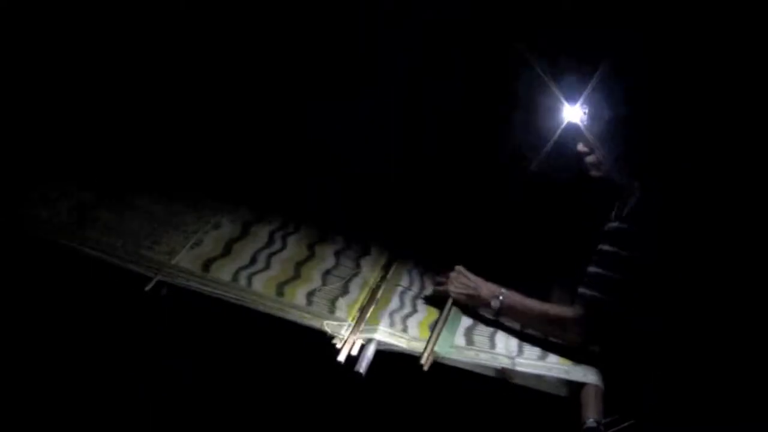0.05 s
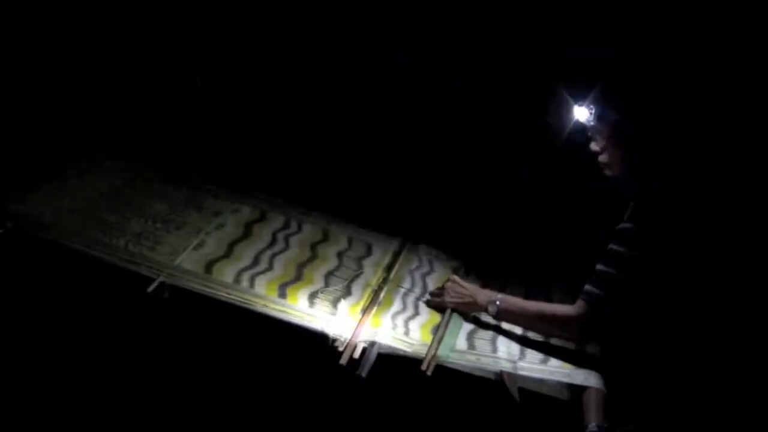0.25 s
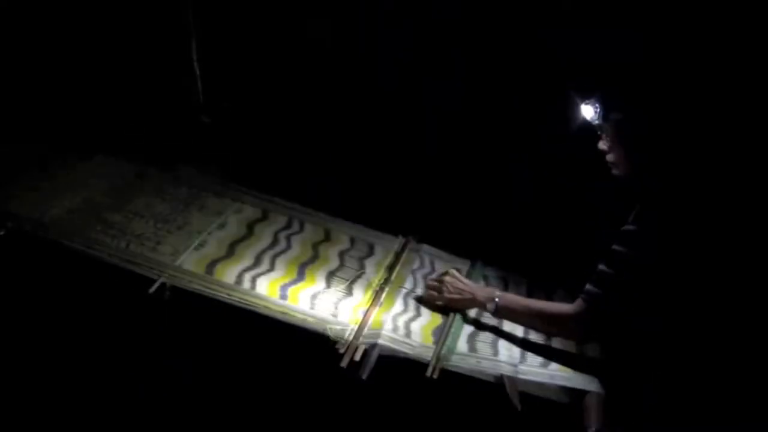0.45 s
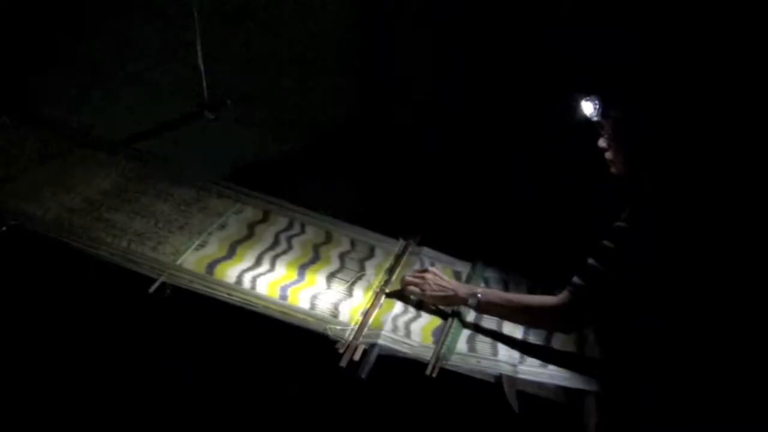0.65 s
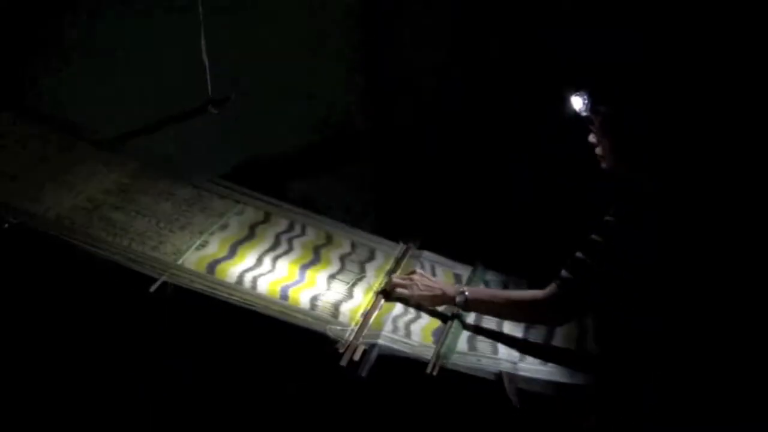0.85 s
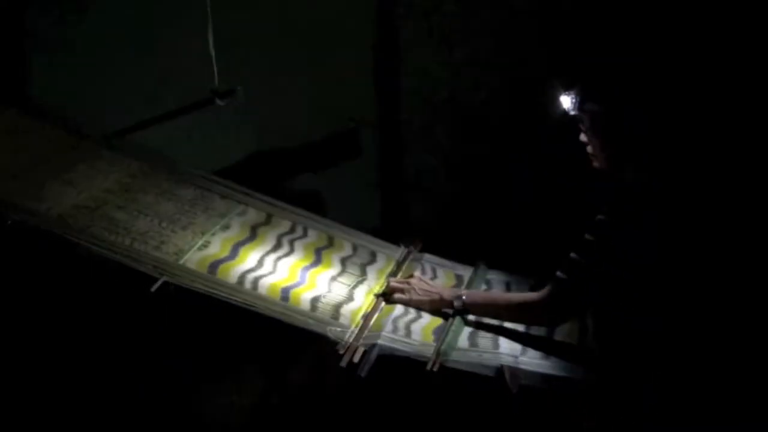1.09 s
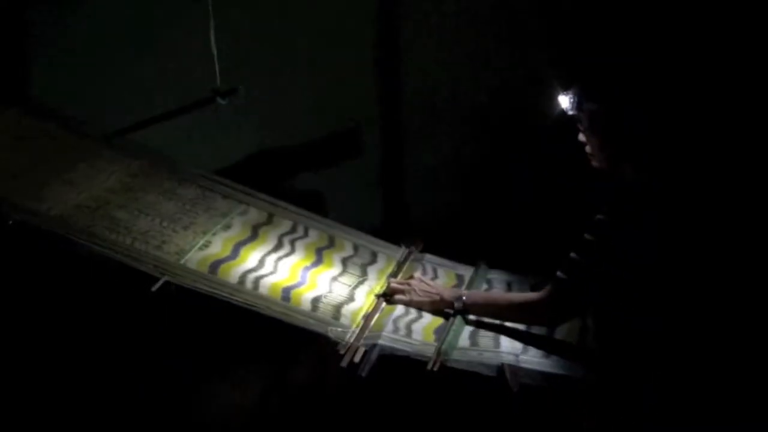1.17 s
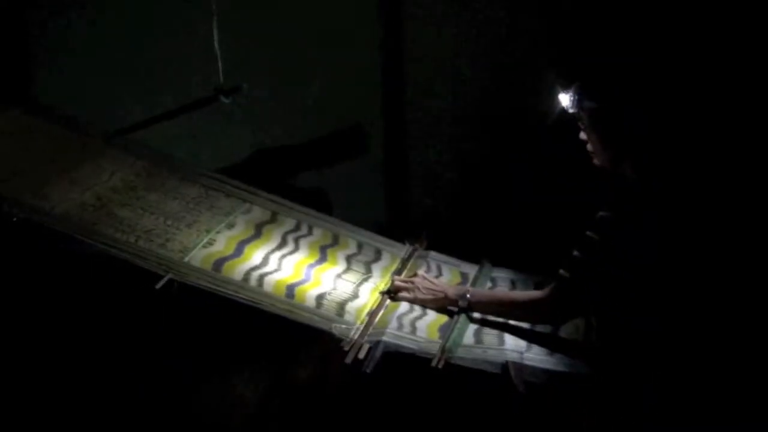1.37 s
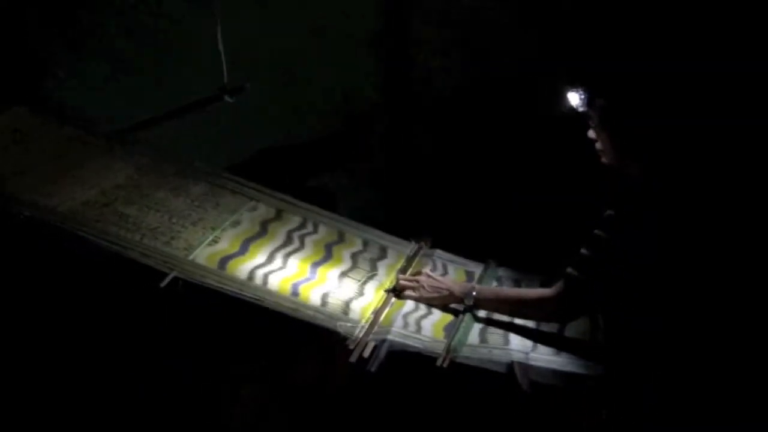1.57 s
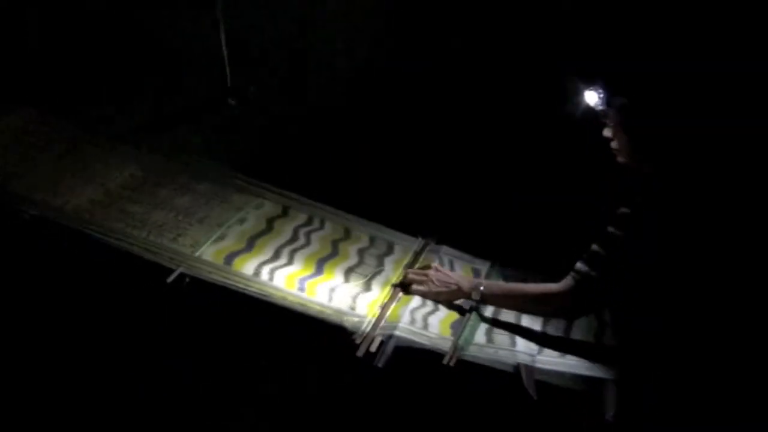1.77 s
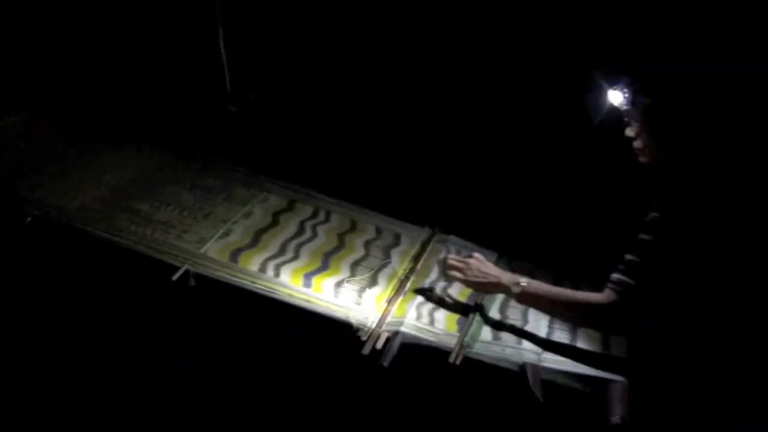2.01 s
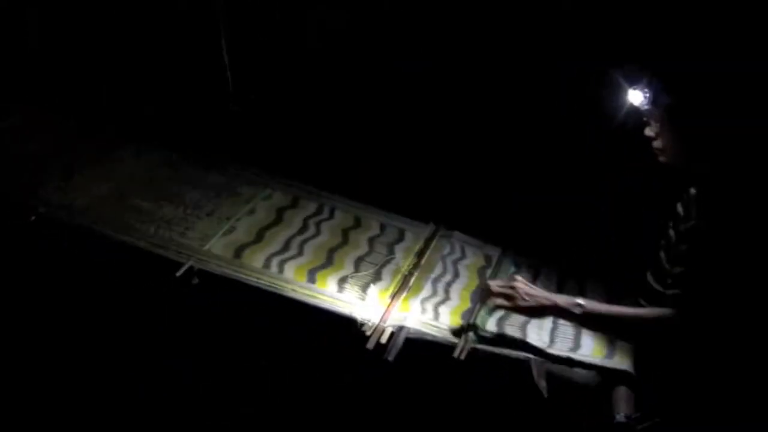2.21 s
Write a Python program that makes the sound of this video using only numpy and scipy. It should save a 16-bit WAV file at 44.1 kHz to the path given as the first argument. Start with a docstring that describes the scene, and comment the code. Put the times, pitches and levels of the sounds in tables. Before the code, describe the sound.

In a small, hard-walled room, a stick clacks brightly against loom rods and taps again, then a wooden bar knocks into place. Fingers barely brush the threads near the end, over faint hiss and a thin whine.

```python
"""A small, hard-walled room at night, with a hand loom. A hard stick clacks against the rods and taps
again; a wooden bar is nudged and knocks home. Each impact radiates a pulse, which the near walls
reflect, and excites damped modes. Fingers then brush the warp threads. Behind it all lie faint
electrical pips, hiss, and a thin whine like far insects."""
import sys
import numpy as np
from scipy import signal
from scipy.fft import rfft, irfft, next_fast_len
from scipy.io import wavfile
from scipy.ndimage import map_coordinates

SR = 44100
rng = np.random.default_rng(int(sys.argv[2]) if len(sys.argv) > 2 else 0)


def digitize_waveform(pressure):
    """Quantize a signal to 16-bit integers and store it at the path in sys.argv[1].

    Rows of a 2-D input are taken as channels; values are limited to [-1, 1].
    """
    field = np.atleast_2d(pressure).T
    bounded = np.clip(field, -1, 1)
    quanta = np.round(bounded * 32767).astype(np.int16)
    wavfile.write(sys.argv[1], SR, quanta)


N = 99225


# Blows of the stick. Each row: start in seconds, crack, stick ring and rod ring levels in dB,
# contact cut-off in Hz, room gain in dB.
STICK_BLOWS = [(0.2415, -0.5, -29.5, -41.5, 17000, 3.5), (0.4779, -23, -52.5, -51, 4500, -1),
               (0.528, -35, -65, -57, 2130, 2.5)]
# Spectrum of the crack. Each row: frequency in Hz, relative level in dB.
CRACK_SPECTRUM = [(60, -61), (160, -44), (350, -42), (700, -25), (1400, -24), (2100, -11.5), (3200, -7),
                  (4150, 4), (4900, 2), (6200, -6.5), (7600, -12.5), (8900, -7.5), (9500, -7.5),
                  (10400, -15.5), (12300, -24), (15500, -30)]
# Modes of stick and rods. Each row: frequency in Hz, relative level in dB, 60 dB decay time in seconds.
STICK_MODES = [(3497, -10, .36), (3672, -5, .3), (3925, -7, .4), (4097, 0, .31), (4174, -4, .26),
               (4232, -2, .3), (4548, -7, .52), (4582, -6, .33), (4802, 2, .28), (5042, -4, .25),
               (5284, -1, .22), (5611, -4, .32), (5857, -13, .3), (6457, -13, .22), (8925, -11, .36),
               (9050, -13, .33)]
ROD_MODES = [(1879, 0, .22), (2107, -4, .2), (2601, -6, .25), (2751, -6, .25)]
def stick():
    """Impact excitation: a hard contact gives a bright crack and sets stick and rods vibrating freely."""
    out = np.zeros(N)
    for start, crack_db, stick_db, rod_db, cut_hz, room_db in STICK_BLOWS:
        crack = signal.fftconvolve(impact(CRACK_SPECTRUM, cut_hz), room(room_db, smear_s=0.000777))
        add(out, start, amp(crack_db) * crack)
        for modes, db in (STICK_MODES, stick_db), (ROD_MODES, rod_db):
            add(out, start, amp(db) * ring(modes, cut_hz, attack_s=0.00067, rough=0.73, flutter_hz=56.94))
    return out


# Blows of the bar. Each row: start in seconds, thud and ring levels in dB, contact cut-off in Hz,
# room gain in dB.
BAR_BLOWS = [(1.2709, -29, -63, 1391, 2.5), (1.277, -25.5, -74, 6500, 0.5),
             (1.3002, -15.5, -32.5, 6100, -5.5), (1.3093, -16, -69, 6360, -5)]
# Spectrum of the thud. Each row: frequency in Hz, relative level in dB.
THUD_SPECTRUM = [(60, -45), (140, -45), (290, -11), (480, -17), (720, -5.5), (930, -13), (1170, 0),
                 (1380, -10.5), (1630, 4.5), (1860, -10.5), (2090, 5), (2350, -5.5), (2620, -4),
                 (2950, -11), (4700, -17), (5200, -12), (6200, -28), (14000, -40)]
# Modes of the bar. Each row: frequency in Hz, relative level in dB, 60 dB decay time in seconds.
BAR_MODES = [(737, -16, .36), (1150, -14, .32), (1202, -17, .25), (1624, -3, .27), (1705, -11, .18),
             (2003, -9, .16), (2075, -6, .13), (2125, 1, .24), (2173, -9, .2), (2631, -9, .2),
             (5130, -16, .28)]
def bar():
    """Impact excitation: a softer contact gives a dull thud and the hollow resonance of wood."""
    out = np.zeros(N)
    for start, thud_db, ring_db, cut_hz, room_db in BAR_BLOWS:
        thud = signal.fftconvolve(impact(THUD_SPECTRUM, cut_hz), room(room_db, smear_s=0.00113))
        add(out, start, amp(thud_db) * thud)
        add(out, start, amp(ring_db) * ring(BAR_MODES, cut_hz, attack_s=0.0048, rough=0.3, flutter_hz=59))
    return out


def impact(spectrum, cut_hz, size=2048):
    """Minimum phase: folding the cepstrum turns a spectrum into a causal pulse, here of unit energy."""
    hz = np.fft.rfftfreq(size, 1 / SR)
    cepstrum = irfft(np.log(amp(along(spectrum, hz)) * softness(hz, cut_hz)))
    folded = np.r_[cepstrum[0], 2 * cepstrum[1:size // 2]]
    pulse = irfft(np.exp(rfft(folded, size)))
    return pulse / np.linalg.norm(pulse)


def ring(modes, cut_hz, attack_s, rough, flutter_hz):
    """Modal superposition: damped modes add, each fluttering in level and phase as if echoes overlapped."""
    t = np.arange(SR) / SR
    out = np.zeros(len(t))
    for hz, db, t60 in modes:
        knots = rng.standard_normal((2, 256))
        in_phase, quadrature = (rough * map_coordinates(k, [t * flutter_hz], mode="mirror") for k in knots)
        phase = 2 * np.pi * (hz * t + rng.random())
        level = amp(db - 60 * t / t60) * softness(hz, cut_hz)
        out += level * ((1 + in_phase) * np.sin(phase) + quadrature * np.cos(phase))
    return out * (1 - np.exp(-t / attack_s))


def softness(hz, cut_hz):
    """Contact compliance: a soft contact acts as a low-pass filter."""
    return 1 / np.sqrt(1 + (hz / cut_hz) ** 6)


# Reflections from near walls. Each row: delay in seconds, relative level in dB.
WALL_ECHOES = [(.0073, -2.5), (.0112, -1), (.0156, -6.5), (.0199, -3), (.0243, -10)]
# Decay of the room. Each row: frequency in Hz, reverberation time in seconds.
REVERB_TIMES = [(200, 0.46), (1000, .48), (2500, 0.35), (4500, 0.41), (9000, 0.35), (14000, 0.34)]
# Spectrum of the tail. Each row: frequency in Hz, relative level in dB.
TAIL_SPECTRUM = [(300, 1.5), (1300, 3.5), (2500, 4.5), (4500, -4.5), (7000, -1), (9000, 4.5), (13000, -2)]
def room(room_db, smear_s):
    """Reverberation: direct sound, floor and wall echoes, scatter off the loom and a diffuse tail."""
    rise_s, scatter_t60_s = 0.02, 0.082
    hz, t, bands = signal.stft(rng.standard_normal(SR), SR, nperseg=256)
    decay_db = 60 * t / along(REVERB_TIMES, hz)[:, None]
    tail = signal.istft(bands * amp(along(TAIL_SPECTRUM, hz)[:, None] - decay_db), SR, nperseg=256)[1]
    t = np.arange(len(tail)) / SR
    tail *= 1 - np.exp(-t / rise_s)
    scatter = rng.standard_normal(len(t)) * amp(-60 * t / scatter_t60_s)
    response = amp(4) * tail / np.linalg.norm(tail) + amp(1) * scatter / np.linalg.norm(scatter)
    response *= amp(room_db)
    direct, floor = (0, 0), (0.0037, 2.5)  # delay in seconds, gain in dB
    walls = [(delay, db + room_db) for delay, db in WALL_ECHOES]
    for delay, db in [direct, floor] + walls:
        add(response, delay, amp(db) * smear(smear_s))
    return response


def smear(length_s, size=512):
    """Phase dispersion: a click spreads briefly in time while its spectrum stays flat."""
    age = np.arange(size) / SR / length_s
    envelope = age * np.exp(-age)
    click = rng.standard_normal(size)
    for _ in range(4):
        click = irfft(np.exp(1j * np.angle(rfft(click * envelope))))
    return click


# Finger strokes. Each row: peak time in seconds, Gaussian width in seconds, level in dB.
STROKES = [(1.854, 0.027, -62.5), (1.943, 0.018, -61), (2.062, 0.0081, -53)]
# Spectrum of the rubbing. Each row: frequency in Hz, relative level in dB.
RUB_SPECTRUM = [(200, -6.5), (700, 4), (2500, 1), (4800, 9), (6500, -10), (14000, -16)]
def threads():
    """Friction noise: soft swells as fingers slide over the warp."""
    t = np.arange(N) / SR
    envelope = sum(amp(db) * np.exp(-0.5 * ((t - peak) / width) ** 2) for peak, width, db in STROKES)
    return envelope * noise(lambda hz: amp(along(RUB_SPECTRUM, hz)))


# Colour of the buzz. Each row: frequency in Hz, gain in dB.
BUZZ_FILTER = [(1500, -36), (4000, 2.5), (9500, -11.5), (12000, -12)]
def interference():
    """Periodic electrical interference: tone pips, strong and weak in turn, over a buzz of ticks."""
    pip_hz, pip_width_s, pip_period_s, pip_lead_s = 3045, 0.0013, 0.04, 0.000433
    tick_period_s, tick_lead_s = 0.02, 0.0013
    t, pips, ticks = np.arange(N) / SR, np.zeros(N), np.zeros(N)
    for k in range(1, int(N / SR / pip_period_s) + 1):
        offset = t - k * pip_period_s + pip_lead_s
        level = amp(-48 + k % 2 * rng.uniform(-14, -1))
        envelope = np.exp(-0.5 * (offset / pip_width_s) ** 2)
        pips += level * envelope * np.sin(2 * np.pi * (pip_hz * offset + rng.random()))
    for beat in np.arange(tick_period_s, N / SR, tick_period_s):
        add(ticks, beat - tick_lead_s, amp(-30 + rng.normal(0, 1.7)) * smear(length_s=0.0003))
    return pips + filtered(ticks, lambda hz: amp(along(BUZZ_FILTER, hz)))


# Spectra of the hiss and the low ring. Each row: frequency in Hz, relative level in dB.
HISS_SPECTRUM = [(25, -43), (60, -27), (120, -12.5), (210, -5.5), (400, -2.5), (700, 0), (1650, -0.5),
                 (2200, -4.5), (3000, 0.5), (3750, -3), (4150, 1), (4600, 3.5), (5550, 1), (6200, -10.5),
                 (9700, -9), (10500, -13), (15500, -19)]
LOW_RING_SPECTRUM = [(100, -21), (240, -6.5), (340, 0.5), (450, -7), (700, 1), (1400, -12), (3000, -15)]
# Thin whines. Each row: centre in Hz, half-width in Hz, level in dB.
WHINE_BANDS = [(4180, 45, -63), (4140, 150, -66.5), (6700, 150, -74.5), (7780, 100, -79), (9900, 130, -82)]
def background():
    """Filtered noise: a broad band hisses, narrow bands whine, and a low ring fades in the room."""
    t = np.arange(N) / SR
    out = amp(-55.5) * noise(lambda hz: amp(along(HISS_SPECTRUM, hz)))
    for centre, width, db in WHINE_BANDS:
        out += amp(db) * noise(lambda hz: 1 / (1 + ((hz - centre) / width) ** 2))
    fade = amp(-56.5 - 14.5 * t)
    return out + fade * noise(lambda hz: amp(along(LOW_RING_SPECTRUM, hz)))


# Colouring of the hiss in the side signal. Each row: frequency in Hz, relative gain in dB.
SIDE_TILT = [(30, -19), (120, -18), (600, -9.5), (1400, -10), (3000, -26), (8000, -59.5)]
def hiss_width():
    """Decorrelation: independent noise between the channels slightly widens the low hiss."""
    return amp(-78) * noise(lambda hz: amp(along(HISS_SPECTRUM, hz) + along(SIDE_TILT, hz)))


def amp(db):
    """Decibels to amplitude ratio."""
    return 10 ** (np.asarray(db) / 20)


def along(points, hz):
    """Interpolation on a logarithmic frequency axis."""
    frequencies, values = np.transpose(points)
    return np.interp(np.log(hz + 1), np.log(frequencies + 1), values)


def filtered(x, response):
    """Linear filtering: the spectrum is multiplied by a frequency response."""
    size = next_fast_len(N + SR // 2)
    return irfft(rfft(x, size) * response(np.fft.rfftfreq(size, 1 / SR)), size)[..., :N]


def noise(response):
    """Spectral shaping: white noise is coloured and scaled to unit rms."""
    x = filtered(rng.standard_normal(N), response)
    return x / np.sqrt(np.mean(x ** 2) + 1e-20)


def add(track, start_s, sound):
    """Superposition: a sound adds to the track from its start time."""
    i = max(0, round(start_s * SR))
    track[i:i + len(sound)] += sound[:max(0, len(track) - i)]


def scene():
    """Mid-side stereo: all sources are central, and a faint side signal sets the channels apart."""
    blows = stick() + bar()
    mid = blows + threads() + background() + interference()
    side = hiss_width() + amp(-48.5) * filtered(blows, lambda hz: 1j)  # slight phase mismatch
    return np.array([mid + side, mid - side])


def record(dry):
    """Band limiting: an ideal low-pass filter removes the highest treble."""
    return filtered(dry, lambda hz: hz < 15750)


dry = scene()
out = record(dry)
digitize_waveform(out)
```